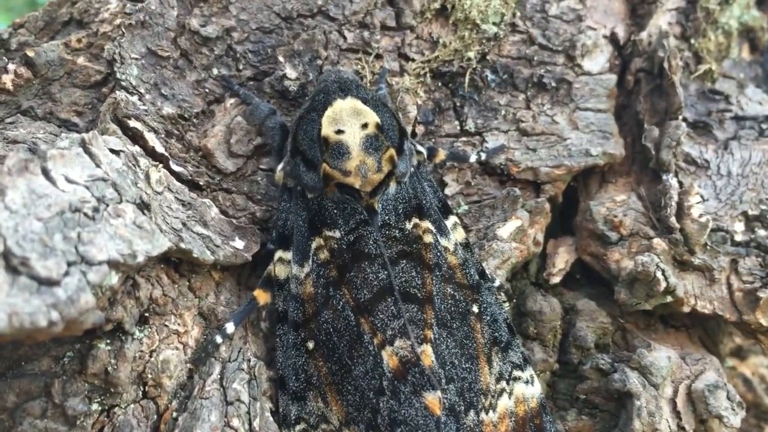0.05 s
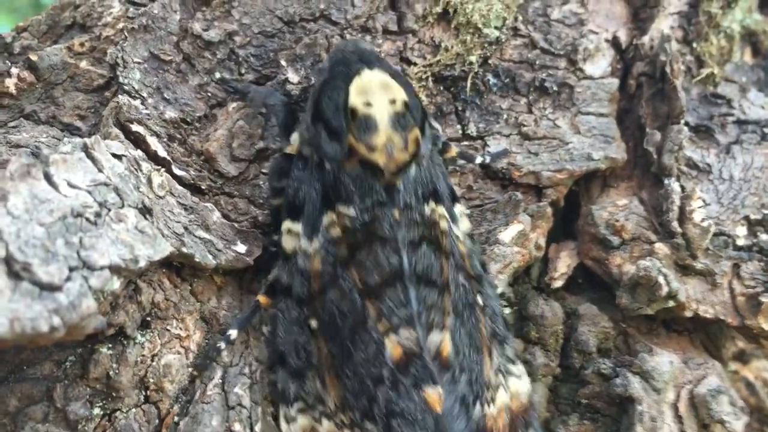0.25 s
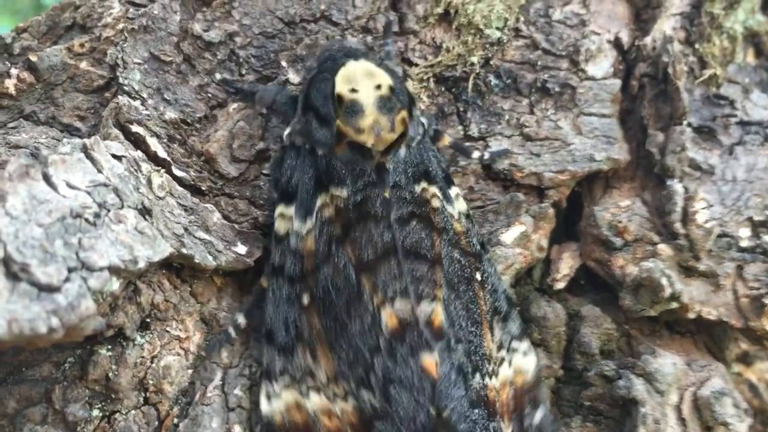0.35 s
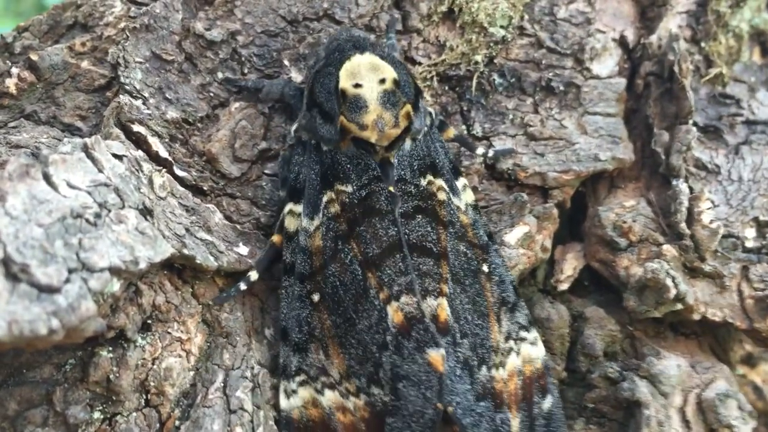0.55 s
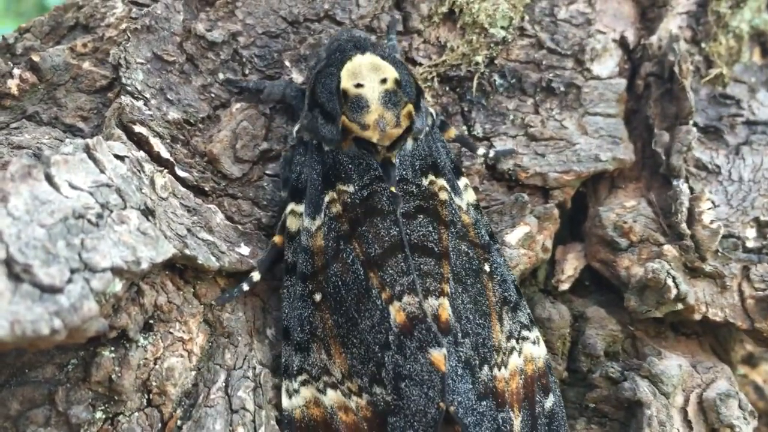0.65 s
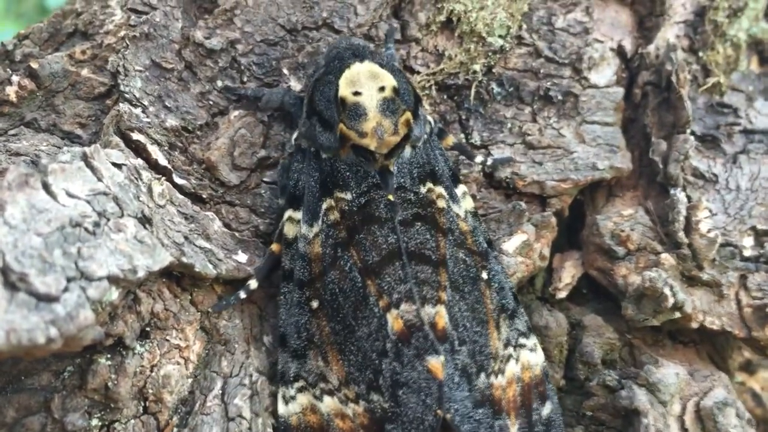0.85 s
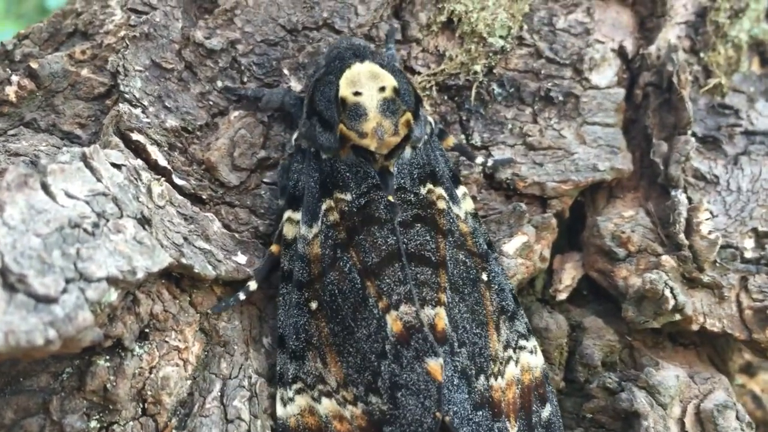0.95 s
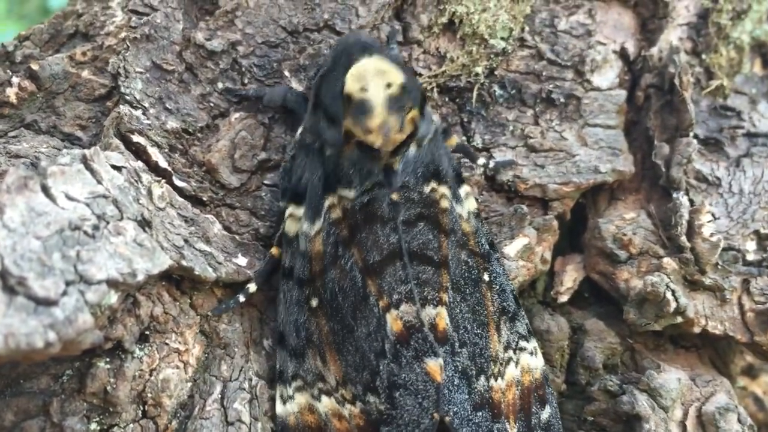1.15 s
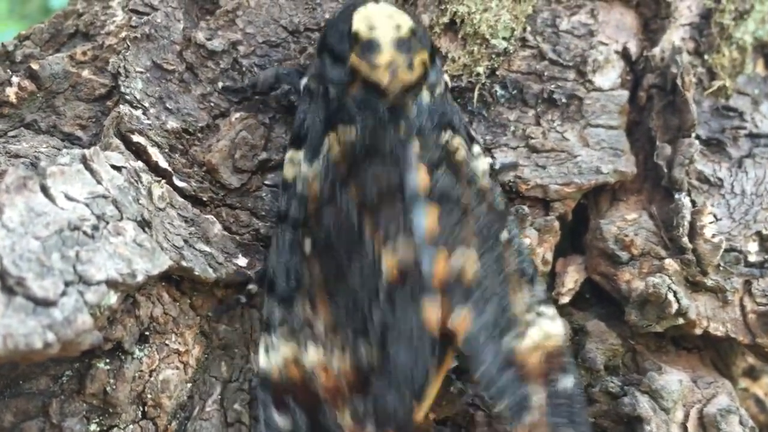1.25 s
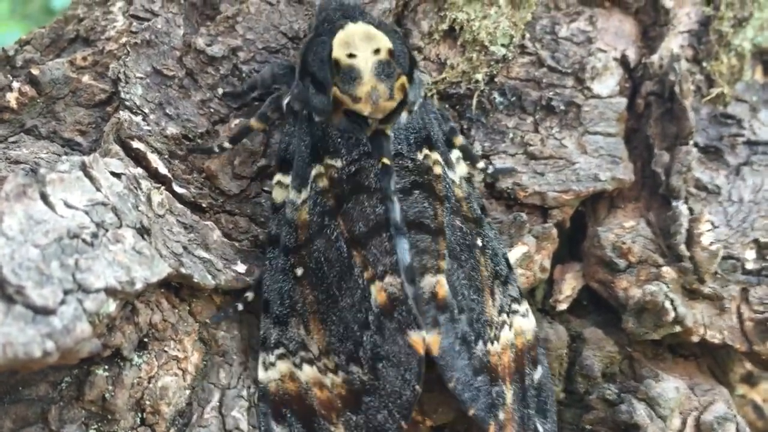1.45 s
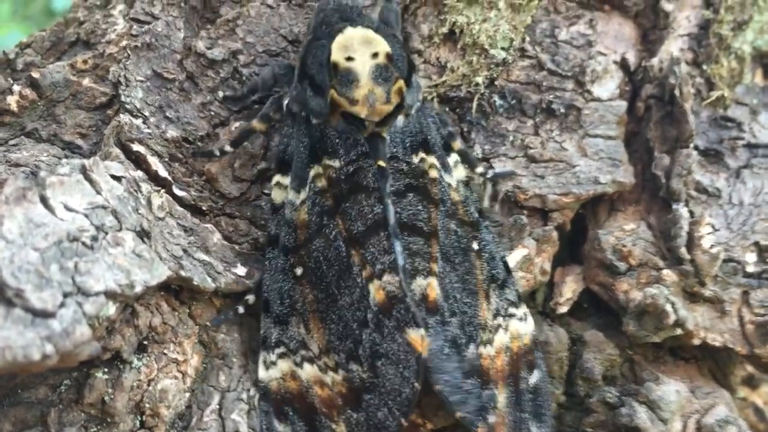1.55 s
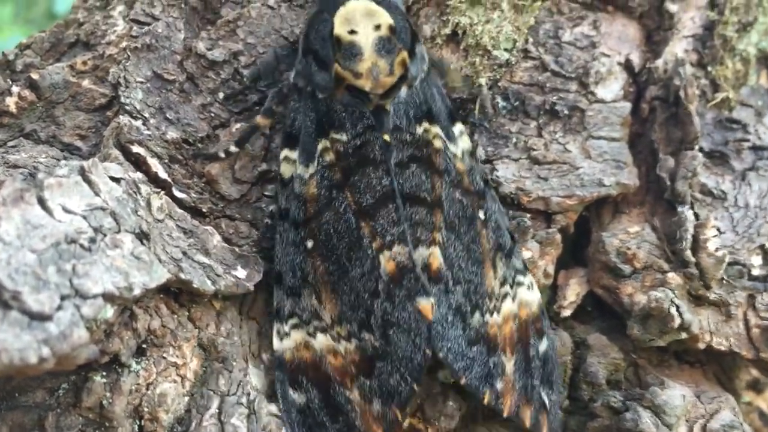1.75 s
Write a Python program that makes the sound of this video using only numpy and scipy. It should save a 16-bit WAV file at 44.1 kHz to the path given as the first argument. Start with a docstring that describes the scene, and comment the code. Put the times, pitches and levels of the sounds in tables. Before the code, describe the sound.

Two short, raspy squeaks from a big moth shifting on tree bark, very close.

```python
"""A quiet low hum and soft brushing, then two sharp squeaks: a large hawkmoth on bark, very close, mono.
Each squeak has two parts: air sucked in makes a flap in the throat click in a fast rasp,
then air pushed out whistles inside a puff of hiss.
Legs and wings brush the bark as the moth jerks; its claws catch with tiny ticks."""
import sys
import numpy as np
from scipy import signal
from scipy.fft import rfft, irfft
from scipy.io import wavfile

SR = 44100
rng = np.random.default_rng(int(sys.argv[2]) if len(sys.argv) > 2 else 0)


def to_wav(sig):
    """Store sig (one row per channel, or 1-D mono) as 16-bit WAV at the path in sys.argv[1].

    Samples outside -1..1 are clipped; the rate is SR.
    """
    pcm = np.clip(np.atleast_2d(sig), -1, 1) * 32767
    pcm = np.round(pcm).astype(np.int16)
    wavfile.write(sys.argv[1], SR, pcm.T)  # frames by channels


N = 79380

# background spectrum: freq_hz, gain_db
BACKGROUND_SPECTRUM = [(20, -31.5), (36, 5.5), (55, -5.5), (74, 2.5), (95, -11), (120, -4.5), (165, -13.5),
                       (218, 2), (255, -8), (295, -19.5), (430, -22.5), (560, -25), (625, -17), (700, -27),
                       (860, -25), (1180, -22), (1430, -23.5), (2000, -27.5), (3000, -33), (6000, -38),
                       (10000, -43), (15000, -45.5)]
# low hum envelope: time_s, level_db
HUM_ENVELOPE = [(0, -53), (.6, -56), (1.2, -54.5), (1.8, -59.5)]
# far-off noise band envelope: time_s, level_db
FAR_ENVELOPE = [(0, -91), (.3, -70), (.36, -66.5), (.48, -78), (.76, -79), (.85, -67.5), (.93, -87),
                (1.06, -73), (1.14, -71.5), (1.55, -70.5), (1.7, -66.5), (1.8, -68.5)]
# wing and leg strokes on bark: start_s, peak_s, end_s, level_db, ring_hz, ring_db
BRUSHES = [(-.02, 0.006, 0.043, -62, 5160, 6), (0.165, 0.22, 0.51, -68, 4500, 7),
           (0.387, 0.39, 0.47, -61, 4840, 4.5), (0.462, 0.5, 0.58, -71.5, 7600, 8),
           (0.872, 0.903, 1.06, -78, 8050, 15), (1.151, 1.28, 2.4, -69.5, 7060, 3),
           (1.447, 1.503, 1.575, -64, 4200, 7), (1.646, 1.705, 1.75, -61.5, 6780, 13),
           (1.744, 1.777, 1.79, -63.5, 5700, 9)]
# bark friction spectrum: freq_hz, gain_db
FRICTION_SPECTRUM = [(500, -20), (2500, -6.5), (5000, -4), (9000, -3), (14000, -11.5), (16000, -2.5)]
# claws catching: start_s, level_db, ring_hz
CLAW_TICKS = [(.4016, -64, 7270), (.418, -58, 8600), (.5705, -56, 4270), (1.2952, -47, 12000),
              (1.415, -52, 12500), (1.4196, -39, 9500), (1.538, -48.5, 5840), (1.617, -57.5, 4440),
              (1.709, -51, 10900), (1.784, -55, 5800)]
# one curve per whistle: time_s, pitch_hz, level_db
WHISTLE_CURVES = [
    [(.3412, 6270, -37), (.3428, 7020, -42), (.3444, 5390, -32.5), (.3462, 7500, -36.5), (.3485, 7830, -42),
     (.3525, 6900, -36.5), (.3545, 5900, -36), (.365, 5570, -30), (.375, 5180, -34.5), (.38, 4500, -53)],
    [(.379, 5170, -53), (.383, 5860, -49), (.385, 4470, -54), (.388, 3200, -52)],
    [(1.4228, 4400, -47), (1.4248, 5450, -36), (1.427, 5450, -35), (1.429, 5980, -37.5), (1.437, 6040, -36),
     (1.445, 5980, -40.5), (1.449, 5790, -38.5), (1.453, 5400, -47)],
]
# exhaled air: start_s, peak_s, end_s, level_db
PUFFS = [(.343, 0.386, 0.3965, -46.5), (1.404, 1.448, 1.485, -53)]
# exhaled air spectrum: freq_hz, gain_db
PUFF_SPECTRUM = [(500, -18), (2500, -15), (4000, -2), (6000, 2.5), (8500, -1.5), (11000, -11.5),
                 (14500, -3), (16000, -13)]
# near reflections: delay_s, gain_db
ECHOES = [(.00072, -23), (.0021, -37), (.0039, -14)]
# flap click spectrum, one per rasp: freq_hz, gain_db
FLAP_SPECTRA = [
    [(300, -38), (1200, -30), (1800, -19), (2700, -12), (4200, -1), (4850, -1.5), (5450, 5.5), (6100, 1.5),
     (7700, -1.5), (8300, 2), (9900, -2), (10600, -20.5), (12500, -8), (14700, -8), (15500, -27)],
    [(300, -37), (1200, -24), (2200, -12), (4400, 0.5), (4850, 1), (5450, 5.5), (6200, 1.5), (7100, 3.5),
     (7950, -4), (8550, 3), (9700, 1), (10400, -7.5), (13500, -5.5), (15500, -19)],
]
# single flap clicks around the rasps: time_s, gain_db, tilt_db_per_octave
LONE_CLICKS = [(0.2231, -37, -1), (0.2253, -38, -1), (0.3195, -40, -14), (0.328, -34.5, -9),
               (0.3306, -39, -2), (0.333, -41, -14), (.3343, -35, -10), (1.2971, -42, 0), (1.2992, -41, -9),
               (1.3011, -40, -1), (1.3974, -33, -3), (1.4002, -27.5, -0.5), (1.4038, -32.5, 3)]
# one curve per rasp: time_s, click_rate_hz, gain_db
RASP_CURVES = [
    [(.226, 1350, -35), (.2315, 1400, -23), (.2355, 1040, -21), (.239, 1180, -21.5), (.248, 905, -18),
     (.268, 865, -17.5), (.279, 870, -20), (.2915, 490, -19.5), (.295, 620, -25), (.304, 590, -24.5),
     (.31, 230, -22), (.317, 1000, -40)],
    [(1.304, 660, -37), (1.307, 675, -29), (1.319, 520, -23.5), (1.322, 560, -23), (1.332, 640, -19.5),
     (1.347, 520, -21), (1.356, 730, -23.5), (1.359, 590, -18), (1.37, 400, -29), (1.377, 315, -21.5)],
]
# treble lost by the end of each rasp: loss_db_per_octave
RASP_DULLING = [6.5, 0]


def amp(db):
    """Decibels to gain."""
    return 10 ** (np.asarray(db) / 20)


def unit_rms(x):
    """Scales to rms 1."""
    return x / np.sqrt(np.mean(x ** 2) + 1e-20)


def spectrum_db(points, hz):
    """Interpolates a spectrum over log frequency."""
    freq_hz, gain_db = np.transpose(points)
    return np.interp(np.log(hz + 1), np.log(freq_hz), gain_db)


def add(mix, start_s, sound):
    """Mixes a sound in at start_s."""
    at = round(start_s * SR)
    sound = sound[max(-at, 0):]
    part = mix[max(at, 0):][:len(sound)]
    part += sound[:len(part)]


def noise(shape_db, size=N):
    """Noise of rms 1 with spectrum shape_db(hz)."""
    white = rng.standard_normal(N)[:size]
    hz = np.fft.rfftfreq(size, 1 / SR)
    return unit_rms(irfft(rfft(white) * amp(shape_db(hz)), size))


def wander(corner_hz, size=N):
    """Smooth random drift, rms about 1."""
    return noise(lambda hz: -20 * np.log10(1 + (hz / corner_hz) ** 4))[:size]


def swell(start_s, peak_s, end_s, edge_db):
    """Gain that rises to a peak and dies away."""
    t = np.arange(start_s, max(end_s, start_s + .01), 1 / SR)
    gain_db = np.interp(t, [start_s, peak_s, end_s], [edge_db, 0, edge_db])
    return amp(gain_db) * signal.windows.tukey(len(t), .2)


def background(low_cut_hz=27, split_hz=348, far_hz=1014, far_half_width_hz=57):
    """A wavering low hum, a faint wash and a far-off narrow noise band that swells and fades."""
    def rolloff_db(ratio):
        return -10 * np.log10(1 + ratio ** 8)
    t = np.arange(N) / SR
    hum = noise(lambda hz: spectrum_db(BACKGROUND_SPECTRUM, hz)
                + rolloff_db(hz / split_hz) + rolloff_db(low_cut_hz / (hz + 1)))
    wash = noise(lambda hz: spectrum_db(BACKGROUND_SPECTRUM, hz) + rolloff_db(split_hz / (hz + 1)))
    far = noise(lambda hz: -20 * np.log10(1 + ((hz - far_hz) / far_half_width_hz) ** 2))
    hum_db = np.interp(t, *np.transpose(HUM_ENVELOPE)) + 1.22 * wander(corner_hz=37)
    wash_db = -66.5 + .3 * wander(corner_hz=12)
    far_db = np.interp(t, *np.transpose(FAR_ENVELOPE))
    return hum * amp(hum_db) + wash * amp(wash_db) + far * amp(far_db)


def bark_friction(ring_hz, ring_db, size, half_width_hz=260, grain_db=1.5, grain_hz=710):
    """Grainy friction on bark excites a pair of thin resonances."""
    hiss = noise(lambda hz: spectrum_db(FRICTION_SPECTRUM, hz), size)
    grains = hiss * amp(grain_db * wander(grain_hz, size))
    hz = np.fft.rfftfreq(size, 1 / SR)
    peaks_db = sum(ring_db / (1 + ((hz - peak_hz) / half_width_hz) ** 2)
                   for peak_hz in (ring_hz, 1.14 * ring_hz))
    return unit_rms(irfft(rfft(grains) * amp(peaks_db), size))


def brushes():
    """Wings and legs rub the bark in soft swells."""
    out = np.zeros(N)
    for start_s, peak_s, end_s, level_db, ring_hz, ring_db in BRUSHES:
        gain = amp(level_db) * swell(start_s, peak_s, end_s, edge_db=-15)
        add(out, start_s, gain * bark_friction(ring_hz, ring_db, len(gain)))
    return out


def claw_ticks(rise_s=.00031, decay_s=.0011):
    """Claws catch on the bark in tiny bursts of friction."""
    out = np.zeros(N)
    t = np.arange(SR // 40) / SR
    envelope = np.minimum(t / rise_s, 1) * np.exp(-t / decay_s)
    for start_s, level_db, ring_hz in CLAW_TICKS:
        add(out, start_s, amp(level_db) * envelope * bark_friction(ring_hz, ring_db=11.5, size=len(t)))
    return out


def whistles(octave_db=-22, waver_hz=710, pitch_waver=.0035, gain_waver=.039):
    """Air pushed out sings a gliding tone with a weak octave."""
    out = np.zeros(N)
    for curve in WHISTLE_CURVES:
        time_s, pitch_hz, level_db = np.transpose(curve)
        t = np.arange(time_s[0], time_s[-1], 1 / SR)
        glide_hz = np.interp(t, time_s, pitch_hz) * (1 + pitch_waver * wander(waver_hz, len(t)))
        phase = 2 * np.pi * np.cumsum(glide_hz) / SR
        gain = amp(np.interp(t, time_s, level_db)) * (1 + gain_waver * wander(waver_hz, len(t)))
        add(out, time_s[0], gain * (np.sin(phase) + amp(octave_db) * np.sin(2 * phase)))
    return out


def puffs():
    """Air rushing out hisses around the whistles."""
    out = np.zeros(N)
    for start_s, peak_s, end_s, level_db in PUFFS:
        gain = amp(level_db) * swell(start_s, peak_s, end_s, edge_db=-13.5)
        add(out, start_s, gain * noise(lambda hz: spectrum_db(PUFF_SPECTRUM, hz), len(gain)))
    return out


def flap_clicks(times_s, gains_db, tilts_db_per_octave, spectrum):
    """Flap clicks ring briefly in the throat, then reflect and scatter off the bark."""
    boost_db, flutter_db, tilt_pivot_hz = 6.5, .67, 5600
    scatter_db, scatter_rise_s, scatter_decay_s, scatter_top_hz = -9.5, .0006, .0032, 9700
    size, lead_s = 1024, .002
    hz, t = np.fft.rfftfreq(size, 1 / SR), np.arange(size) / SR
    log_gain = np.log(amp(spectrum_db(spectrum, hz)))
    mirrored = np.r_[log_gain, log_gain[-2:0:-1]]
    throat = np.exp(np.conj(signal.hilbert(mirrored)))[:len(hz)]  # minimum phase
    paths = 1 + sum(amp(db) * np.exp(-2j * np.pi * hz * delay_s) for delay_s, db in ECHOES)
    octaves = np.log2(np.maximum(hz / tilt_pivot_hz, 1 / 4))
    scatter_gain = amp(scatter_db) / np.sqrt(1 + (hz / scatter_top_hz) ** 6)
    scatter_envelope = np.exp(-t / scatter_decay_s) * np.minimum(t / scatter_rise_s, 1) ** 2
    whites = rng.standard_normal((256, size))  # one row per click
    out = np.zeros(N)
    for time_s, gain_db, tilt, white in zip(times_s, gains_db, tilts_db_per_octave, whites):
        scatter = white * scatter_envelope
        bark = paths + scatter_gain * rfft(scatter / np.linalg.norm(scatter))
        start_s = round((time_s - lead_s) * SR) / SR
        delay = np.exp(-2j * np.pi * hz * (time_s - start_s))  # sub-sample timing
        gain = amp(gain_db + boost_db + flutter_db * white[0] + tilt * octaves)
        add(out, start_s, -irfft(gain * throat * bark * delay))
    return out


def rasp(curve, spectrum, loss_db_per_octave, jitter=.03, jitter_hz=280):
    """Air drawn in clicks the flap hundreds of times a second, duller as the effort runs out."""
    time_s, click_rate_hz, gain_db = np.transpose(curve)
    t = np.arange(time_s[0], time_s[-1], 1 / SR)
    rate_hz = np.interp(t, time_s, click_rate_hz) * (1 + jitter * wander(jitter_hz, len(t)))
    cycles = np.cumsum(rate_hz) / SR
    clicks_s = np.interp(np.arange(0, cycles[-1]), cycles, t)
    progress = (clicks_s - time_s[0]) / (time_s[-1] - time_s[0])
    gains_db = np.interp(clicks_s, time_s, gain_db)
    return flap_clicks(clicks_s, gains_db, -loss_db_per_octave * progress ** 2, spectrum)


def scene():
    """Background and moth, the same in both channels."""
    mix = background() + brushes() + claw_ticks() + whistles() + puffs()
    mix += flap_clicks(*np.transpose(LONE_CLICKS), FLAP_SPECTRA[1])
    for curve, spectrum, loss_db_per_octave in zip(RASP_CURVES, FLAP_SPECTRA, RASP_DULLING):
        mix += rasp(curve, spectrum, loss_db_per_octave)
    return np.array([mix, mix])


def record(dry, cutoff_hz=15500):
    """Steep low-pass band limit."""
    lowpass = signal.firwin(401, cutoff_hz, window=("kaiser", 8), fs=SR)
    return signal.oaconvolve(dry, lowpass[None], "same")


dry = scene()
out = record(dry)
to_wav(out)
```